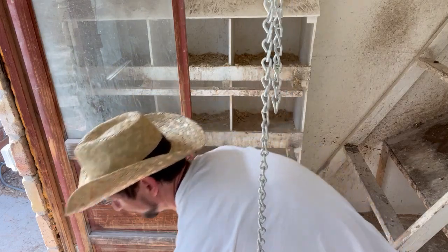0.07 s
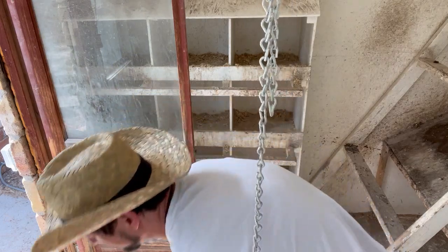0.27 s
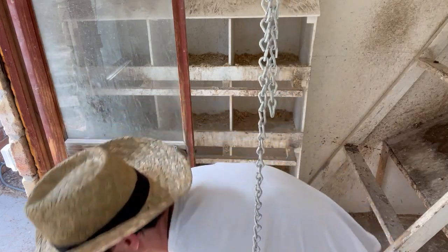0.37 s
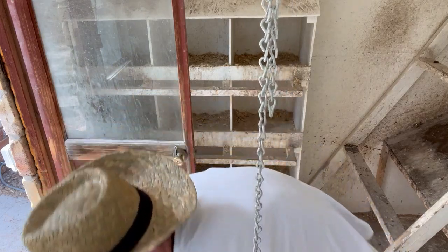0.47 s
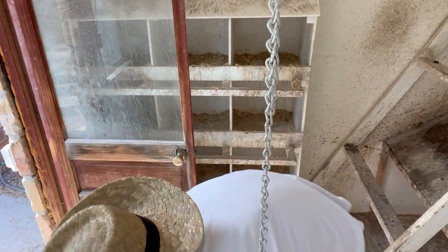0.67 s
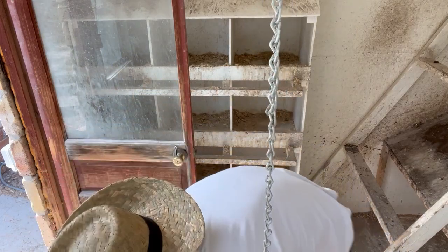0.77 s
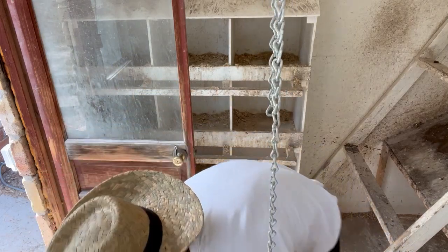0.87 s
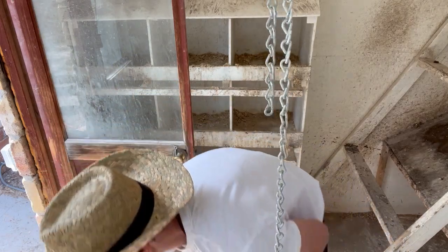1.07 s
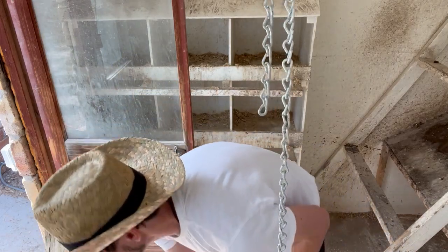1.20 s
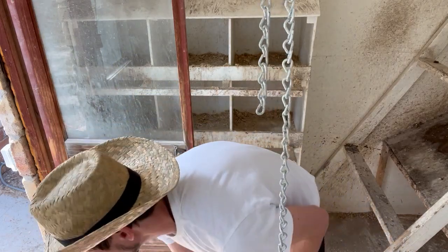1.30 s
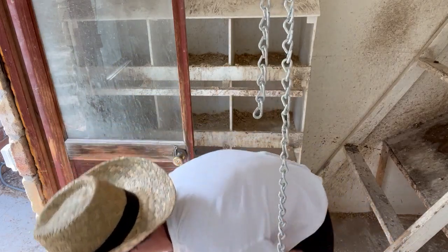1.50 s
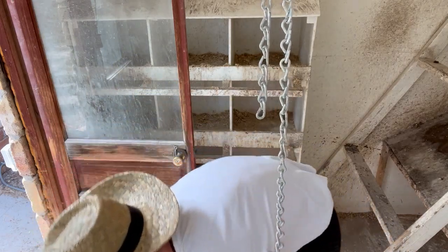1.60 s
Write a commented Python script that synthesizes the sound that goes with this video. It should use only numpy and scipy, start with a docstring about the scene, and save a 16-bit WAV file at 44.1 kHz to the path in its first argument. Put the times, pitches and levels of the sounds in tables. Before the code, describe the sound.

A scraper lands on a wooden floor with a hard thump at about 0.1 seconds. Grit settles faintly and a light tap follows near 0.5. From 0.6 to 1.25 the blade drags through dry litter, rasping, crunching and hissing, growing louder and juddering as the boards drone. A short scuff and hollow knock come at about 1.35. The small coop's walls ring briefly.

```python
"""Scraping a coop floor

A scraper lands hard on the wooden floor of a small coop; grit settles and a light tap follows.
Dragged through dry litter, the blade rasps and hisses in thousands of tiny slips, judders as it is
pressed down and makes the boards drone. A short scuff and a hollow knock end it. The walls ring briefly."""
import sys
import numpy as np
from scipy import signal
from scipy.fft import rfft, irfft, next_fast_len
from scipy.io import wavfile
from scipy.ndimage import map_coordinates

SR = 44100
rng = np.random.default_rng(int(sys.argv[2]) if len(sys.argv) > 2 else 0)


def int16_out(signal):
    """Quantize to a 16-bit WAV file."""
    q = np.round(np.clip(np.atleast_2d(signal).T, -1, 1) * 32767)
    wavfile.write(sys.argv[1], SR, q.astype(np.int16))


N = 72765

# quiet background bed: freq_hz, level_db
AIR_EQ = [(15, -31), (25, -0.5), (91, 4), (203, -8), (407, -1), (1170, -13), (2240, -19), (2820, -21.5),
          (4060, -23.5), (12000, -31), (15600, -22), (22000, -120)]
# narrow board resonances that colour the friction: centre_hz, width_hz, gain_db
BOARD_RESONANCES = [(222, 14, 0), (288, 14, 0), (355, 12, 2), (485, 12, 3), (540, 11, 4), (565, 12, -1),
                    (679, 14, 0), (724, 25, 0), (778, 14, -2), (877, 11, 4), (990, 12, 0), (1065, 18, 0),
                    (1243, 16, 0), (1960, 38, -2), (2256, 25, -3)]
# decay of the close walls: freq_hz, t60_s
WALL_DECAY = [(60, 0.37), (400, 0.52), (1100, 0.42), (3000, 0.35), (8000, 0.37), (15000, 0.25)]
# the edge biting in: freq_hz, level_db
BITE_EQ = [(40, -40), (200, 4), (560, -3.5), (800, -2), (1200, -6.5), (1600, -9.5), (2800, -15),
           (3600, -12), (4500, -21.5), (6500, -27), (11000, -34), (15500, -38)]
# the crack of first contact: freq_hz, level_db
CRACK_EQ = [(300, -31), (1050, 9.5), (1700, -13), (4000, -8), (5800, -2.5), (7000, -25), (14000, -27)]
# blows on the floor: start_s, level_db
FLOOR_BLOWS = [(0.11, -42), (0.1406, -12), (.161, -20), (0.189, -28.5), (.592, -39)]
# the floor's ring: pitch_hz, level_db, t60_s
FLOOR_MODES = [(59.2, -11, 0.67), (77.9, 3.5, 0.22), (103.2, -5.5, 0.33), (124, 3.5, 0.18), (156, 2, 0.19),
               (180.3, -4, 0.27), (222.4, 2.5, 0.28), (247.7, -4.5, 0.37), (283, -7.5, 0.42),
               (319.4, -11, 0.44), (359, -13.5, 0.62), (462, -30.5, 1), (600, -26.5, 0.81)]
# dull body of each blow: freq_hz, level_db
THUD_EQ = [(30, -22), (70, 1), (120, 4), (160, -4), (250, -3), (400, -12), (800, -35), (2000, -44)]
# fine grit: freq_hz, level_db
HISS_EQ = [(1500, -3.5), (4000, -5), (6000, -3), (7500, -1), (9200, -1), (11500, -9), (14000, -3.5),
           (15800, -22)]
# the tap's click: freq_hz, level_db
TAP_EQ = [(200, -12.5), (550, -8), (780, 2), (1050, -1.5), (1900, -4.5), (2800, -8), (3700, -7.5),
          (4500, -18.5), (5200, -18), (6000, -43), (12000, -68)]
# the tap's note: pitch_hz, level_db, t60_s
TAP_NOTE_MODES = [(840, -4, 0.12), (1230, -16, 0.14)]
# fader moves for blade on wood: time_s, rasp_db, growl_db
WOOD_FADERS = [(0.56, -68, -79), (0.598, -45.5, -49), (0.634, -34.5, -33), (0.66, -39.5, -41),
               (0.72, -31.5, -36.5), (0.75, -30, -32.5), (0.81, -32, -27), (0.91, -31, -29.5),
               (0.975, -29.5, -24.5), (1.018, -26, -26), (1.034, -36, -35), (1.06, -25, -20),
               (1.18, -27.5, -21.5), (1.25, -45, -38), (1.31, -49, -50)]
# fader moves for blade through litter: time_s, crunch_db, hiss_db
LITTER_FADERS = [(0.52, -57, -88), (0.556, -70, -64), (0.596, -53.5, -52.5), (0.64, -43.5, -51),
                 (0.684, -43.5, -44.5), (0.692, -41, -39.5), (0.77, -37, -43), (0.8, -36, -38.5),
                 (0.83, -37.5, -42.5), (0.922, -34, -40.5), (0.942, -35.5, -36.5), (0.986, -35, -44),
                 (1.008, -34, -38), (1.108, -35, -47.5), (1.19, -38.5, -44), (1.31, -66, -82)]
# the blade's midrange rasp: freq_hz, level_db
RASP_EQ = [(200, -29), (400, -3), (500, 1.5), (750, -3.5), (1000, -10.5), (1600, -38), (4000, -75)]
# the boards' low growl: freq_hz, level_db
GROWL_EQ = [(50, -5.5), (110, 2), (175, 0), (225, 1), (270, -2.5), (345, 1.5), (400, -9.5), (600, -18),
            (1500, -74)]
# dry litter: freq_hz, level_db
CRUNCH_EQ = [(400, -34), (950, -6), (1400, 2.5), (2200, -2), (3000, -6), (4200, -10.5), (6000, -16),
             (12000, -51)]
# strength of the blade's judder: time_s, level_db
JUDDER_FADER = [(0.57, -83), (0.604, -45), (0.624, -31.5), (0.774, -38), (0.866, -27), (0.9, -37),
                (0.97, -22), (1.016, -18.5), (1.046, -20.5), (1.07, -8), (1.1, -9.5), (1.15, -22),
                (1.19, -19.5), (1.22, -27.5), (1.32, -38), (1.386, -36.5), (1.462, -31.5), (1.56, -55)]
# bass-heavy shaping of the judder pulses: freq_hz, gain_db
JUDDER_EQ = [(25, -30), (45, -2), (60, 4.5), (78, -3), (100, 3), (125, -11), (170, -21.5), (400, -37),
             (1000, -83)]
# the blade catching on the boards: start_s, level_db
SNAG_HITS = [(0.603, -42), (0.631, -33), (0.696, -41), (0.798, -38), (1.004, -25), (1.016, -34),
             (1.054, -24.5), (1.078, -25.5), (1.096, -24)]
# tone of a snag: freq_hz, level_db
SNAG_EQ = [(150, -26), (500, -2), (950, 1), (1300, -1), (2100, -6.5), (3000, -14), (4500, -21.5),
           (8000, -20), (15000, -44)]
# fader moves for the groaning board: time_s, low_db, middle_db, high_db
GROAN_FADERS = [(0.661, -48, -56, -59), (0.7, -37, -34.5, -44), (0.755, -26, -32, -44),
                (0.81, -27, -32, -54), (0.88, -36.5, -49, -49), (0.97, -32.5, -40, -35),
                (1.03, -44, -40, -36), (1.07, -31, -28, -40), (1.135, -34, -25, -31),
                (1.18, -47, -25.5, -27.5), (1.23, -40, -42, -40.5), (1.32, -63, -67, -61)]
# its low, middle and high resonances, a group to a row: pitch_hz of each
GROAN_PITCHES = [(285.5, 347.8), (489.2, 541), (718.6,)]
# the closing scuff: freq_hz, level_db
SCUFF_EQ = [(40, -23), (110, -18), (170, -13), (230, -8), (340, -6.5), (430, -8.5), (750, -9), (1100, -13),
            (2000, -17), (4000, -26), (7500, -32.5), (10500, -40.5), (15500, -46)]
# the hollow plank: pitch_hz, level_db, t60_s
PLANK_MODES = [(115, -6, 0.39), (162.9, 3, 0.2), (183.3, 2.5, 0.16), (275, -7, 0.36), (343, 2.5, 0.32),
               (537, -28, 0.27), (609, -3, 0.25), (680, -6.5, 0.18)]
# how alike left and right are: freq_hz, correlation
STEREO_LIKENESS = [(80, 0.95), (170, 0.58), (320, 0.68), (600, 0.014), (2000, 0.04), (5000, 0.055),
                   (7500, 0.18), (9200, 1), (15000, 1)]
# phase between the sides: freq_hz, left_lead_rad
STEREO_PHASE = [(100, 0), (4000, 0), (6300, -1.9), (7700, -1.4), (9100, 0), (11000, 0), (12100, 1.5),
                (13300, 3.14)]
# lean between the sides: freq_hz, left_minus_right_db
STEREO_BALANCE = [(80, 1), (150, -1), (280, -2), (600, -0.4), (1100, 1.8), (2200, 0), (4500, -1),
                  (8000, -1)]

TIME_S = np.arange(N) / SR


def amp(db):
    """Decibels to gain."""
    return 10 ** (np.asarray(db) / 20)


def unit(x):
    """Scale to rms 1."""
    return x / np.sqrt(np.mean(x ** 2) + 1e-20)


def along(points, hz):
    """Read a curve of (freq_hz, value) points on a log axis."""
    freqs, values = np.transpose(points)
    return np.interp(np.log(hz + 1), np.log(freqs + 1), values)


def faders(rows):
    """One gain curve per dB column, silent outside the listed times."""
    times, *columns = np.transpose(rows)
    return [amp(np.interp(TIME_S, times, db, left=-120, right=-120)) for db in columns]


def wobble(rate_hz):
    """A smooth random curve with rate_hz knots a second."""
    return map_coordinates(rng.standard_normal(N // 20), [TIME_S * rate_hz], mode="wrap")


def noise():
    """Two rows of white noise, for mid and side."""
    return rng.standard_normal((2, N))


def filtered(x, response):
    """Apply a complex frequency response."""
    size = next_fast_len(N + SR // 2)
    return irfft(rfft(x, size) * response(np.fft.rfftfreq(size, 1 / SR)), size)[..., :N]


def coloured(x, eq):
    """Shape with an EQ curve, then scale to rms 1."""
    return unit(filtered(x, lambda hz: amp(along(eq, hz))))


def envelope(start_s, db, attack_s, hold_s, t60_s):
    """Linear rise, then exponential release from hold_s after the start."""
    age = TIME_S - start_s
    return np.clip(age / attack_s, 0, 1) * amp(db - 60 * np.maximum(age - hold_s, 0) / t60_s)


def friction(eq, clump_db, slips_per_s=5000, clump_hz=109.4):
    """Tiny random slips excite the boards' resonances; clump_db bunches them unevenly."""
    slips = (rng.random((2, N)) < slips_per_s / SR) * noise()
    slips *= amp(clump_db * wobble(clump_hz))

    def wood(hz):
        return 1 + sum(amp(db) * 1j * hz * width / (centre ** 2 - hz ** 2 + 1j * hz * width)
                       for centre, width, db in BOARD_RESONANCES)
    return coloured(filtered(slips, wood), eq)


def ring(start_s, db, modes, attack_s, waver_db=3.5):
    """A struck board: its modes swell together, waver in level and die each at its own speed."""
    age = np.maximum(TIME_S - start_s, 0)
    tones = sum(amp(level - 60 * age / t60) * np.sin(2 * np.pi * (hz * age + rng.random((2, 1))))
                for hz, level, t60 in modes)
    swell = 1 - np.exp(-age / attack_s)
    return amp(db) * swell * tones * amp(waver_db * wobble(49.12))


def rubbed(pitch_hz, width_hz):
    """One resonance kept ringing by friction, unsteady in pitch and strength."""
    return unit(filtered(noise(), lambda hz: np.exp(-((hz - pitch_hz) / width_hz) ** 2)))


def coop(x, wet_db):
    """Blend in the short reverb of the close walls at about the same overall power."""
    hz, t, spectrum = signal.stft(rng.standard_normal((2, SR // 2)), SR, nperseg=256)
    decay = amp(-60 * t / along(WALL_DECAY, hz)[:, None])
    tail = signal.istft(spectrum * decay, SR, nperseg=256)[1]
    wet = signal.fftconvolve(x, tail / np.linalg.norm(tail[0]), axes=1)[:, :N]
    return (x + amp(wet_db) * wet) / np.hypot(1, amp(wet_db))


def air():
    """A faint, steady bed of low noise."""
    return amp(-50.5) * coloured(noise(), AIR_EQ)


def edge_contacts(land_s=0.107, scuff_s=1.333):
    """The edge cracks and bites as it lands, and scuffs once more after the stroke."""
    bite = friction(BITE_EQ, clump_db=0.7)
    bite *= envelope(land_s, db=-19, attack_s=0.0062, hold_s=0.04, t60_s=0.14)
    scuff = friction(SCUFF_EQ, clump_db=-0.5)
    scuff *= envelope(scuff_s, db=-29, attack_s=0.0093, hold_s=0.06, t60_s=0.19)
    crack = friction(CRACK_EQ, clump_db=1)
    crack *= envelope(land_s, db=-27.5, attack_s=0.0005, hold_s=0.0019, t60_s=0.036)
    return coop(bite + crack, wet_db=-2.5) + coop(scuff, wet_db=-7.5)


def thumps():
    """Each blow rings the floor's modes over a dull thud."""
    out = np.zeros((2, N))
    for start_s, db in FLOOR_BLOWS:
        out += ring(start_s, db, FLOOR_MODES, attack_s=0.0017)
        thud = envelope(start_s, db, attack_s=0.0063, hold_s=0.013, t60_s=0.14)
        out += thud * coloured(noise(), THUD_EQ)
    return out


def settling():
    """A faint trickle of grit disturbed by the landing."""
    trickle = envelope(start_s=0.312, db=-58, attack_s=0.0093, hold_s=0.014, t60_s=0.67)
    return trickle * friction(HISS_EQ, clump_db=-3.5)


def tap(start_s=0.462, db=-31.5):
    """Wood lightly meets wood: a click with a short note."""
    shape = envelope(start_s, db, attack_s=0.002, hold_s=0.0054, t60_s=0.091)
    click = shape * friction(TAP_EQ, clump_db=0)
    return coop(click, wet_db=-1) + ring(start_s, db, TAP_NOTE_MODES, attack_s=0.0021)


def stroke():
    """The dragged blade rasps on wood, makes the boards growl, crunches litter and hisses over grit."""
    rasp_gain, growl_gain = faders(WOOD_FADERS)
    crunch_gain, hiss_gain = faders(LITTER_FADERS)
    rasp = amp(2) * rasp_gain * friction(RASP_EQ, clump_db=1.5)
    growl = amp(-1) * growl_gain * friction(GROWL_EQ, clump_db=0)
    crunch = amp(1) * crunch_gain * friction(CRUNCH_EQ, clump_db=0)
    hiss = amp(3) * hiss_gain * friction(HISS_EQ, clump_db=1.5)
    return coop(rasp + growl + crunch + hiss, wet_db=-6.5)


def judder(rate_hz=78, wander=0.0417):
    """The blade sticks and slips near the floor's lowest strong mode; pressing harder steadies it."""
    depth, = faders(JUDDER_FADER)
    looseness = 1.82 * (1 - depth / depth.max())
    slip_hz = rate_hz * np.exp(wander * (1 + looseness) * wobble(45))
    slips = np.diff(np.floor(np.cumsum(slip_hz) / SR), prepend=0)  # one pulse a cycle
    slips *= amp(2.33 * looseness * wobble(60.26))
    shudder = amp(-0.5) * depth * coloured(slips - slips.mean(), JUDDER_EQ)
    return np.array([shudder, np.zeros(N)])  # mid only


def snags():
    """The edge catches on rough spots in short, gritty bursts."""
    bursts = sum(envelope(start_s, db, attack_s=0.0017, hold_s=0.0058, t60_s=0.056)
                 for start_s, db in SNAG_HITS)
    return bursts * friction(SNAG_EQ, clump_db=2)


def groan():
    """The rubbed board sings under pressure: low resonances first, higher ones as the push grows."""
    voices = [unit(sum(rubbed(hz, width_hz=29.3) for hz in group)) for group in GROAN_PITCHES]
    return sum(gain * voice for gain, voice in zip(faders(GROAN_FADERS), voices))


def squeak(peak_s=0.942, half_width_s=0.019):
    """The rubbing edge squeaks once in mid stroke."""
    swell = amp(-33) * np.exp(-((TIME_S - peak_s) / half_width_s) ** 2)
    return swell * rubbed(pitch_hz=2210, width_hz=94)


def knock():
    """The last scuff ends against a plank, which rings hollow."""
    return ring(start_s=1.349, db=-19.5, modes=PLANK_MODES, attack_s=0.018)


def stereo(pair):
    """Spread mid and side to left and right: narrow bass, wide midrange, phase-skewed treble."""
    def width(hz):
        angle = np.arccos(np.clip(along(STEREO_LIKENESS, hz), -1, 1)) / 2
        return np.array([np.cos(angle), np.sin(angle)])

    def lean(hz):
        half = np.array([[0.5], [-0.5]])
        return np.exp(1j * half * along(STEREO_PHASE, hz)) * amp(half * along(STEREO_BALANCE, hz))
    mid, side = filtered(pair, width)
    return filtered(np.array([mid + side, mid - side]), lean)


def scene():
    """The hits and the long drag over the quiet bed."""
    bed = air()
    hits = edge_contacts() + thumps() + settling() + tap() + knock()
    drag = stroke() + groan() + coop(snags() + squeak(), wet_db=-4.5) + judder()
    return stereo(bed + hits + drag)


def record(dry, low_cut_hz=42, ceiling=0.92, top_hz=15800):
    """Master chain: roll off the sub-bass, round the highest peaks and cut the extreme top."""
    trimmed = signal.sosfilt(signal.butter(2, low_cut_hz, "highpass", fs=SR, output="sos"), dry)
    rounded = trimmed / (1 + np.abs(trimmed / ceiling) ** 8) ** (1 / 8)
    return filtered(rounded, lambda hz: hz < top_hz)


dry = scene()
out = record(dry)
int16_out(out)
```